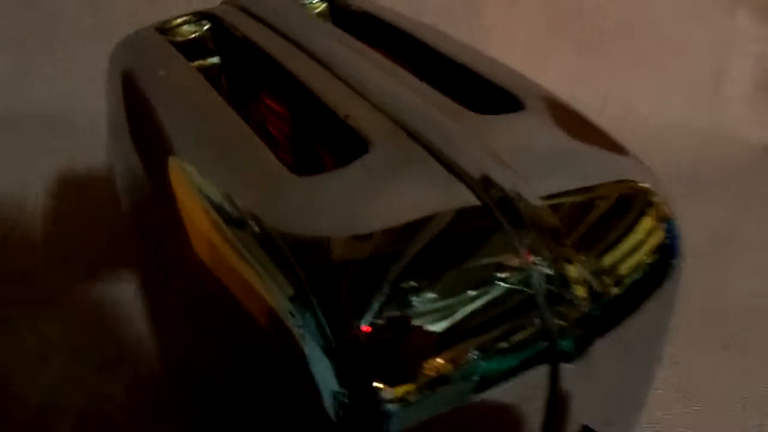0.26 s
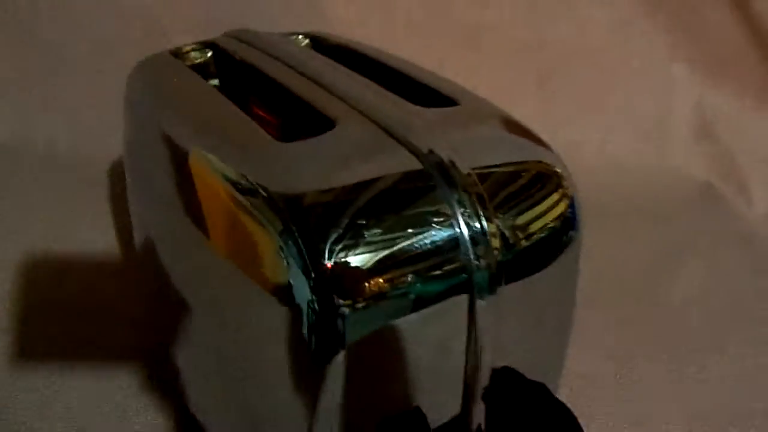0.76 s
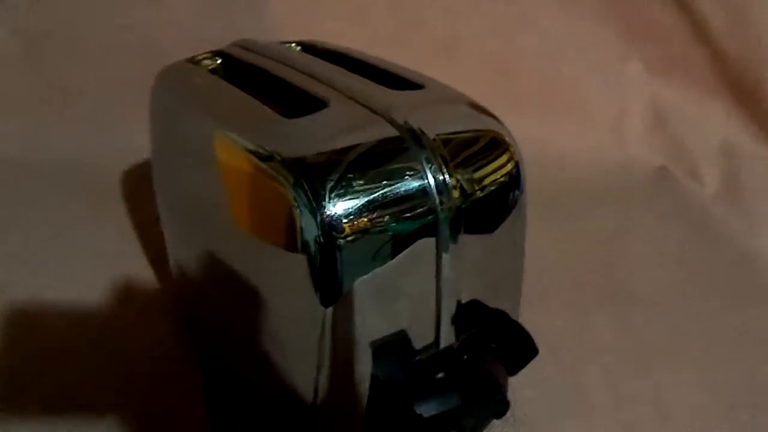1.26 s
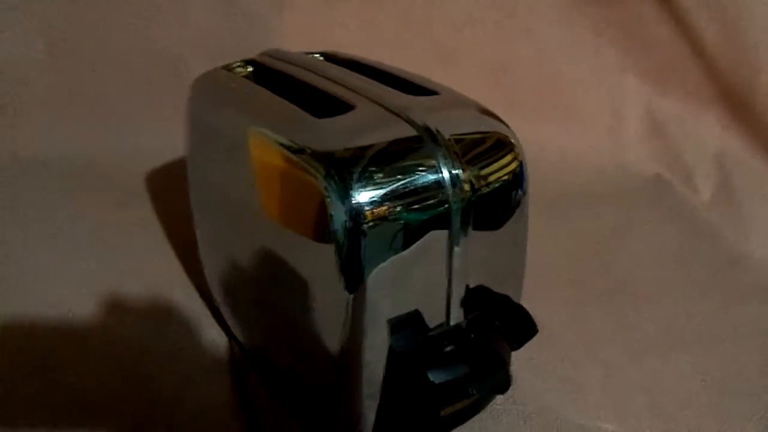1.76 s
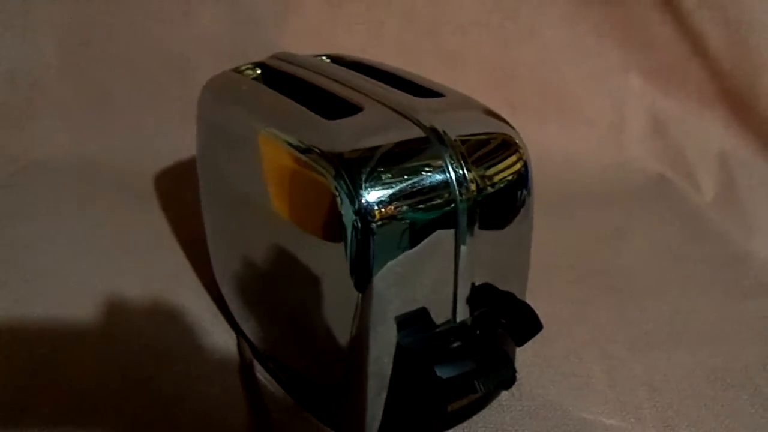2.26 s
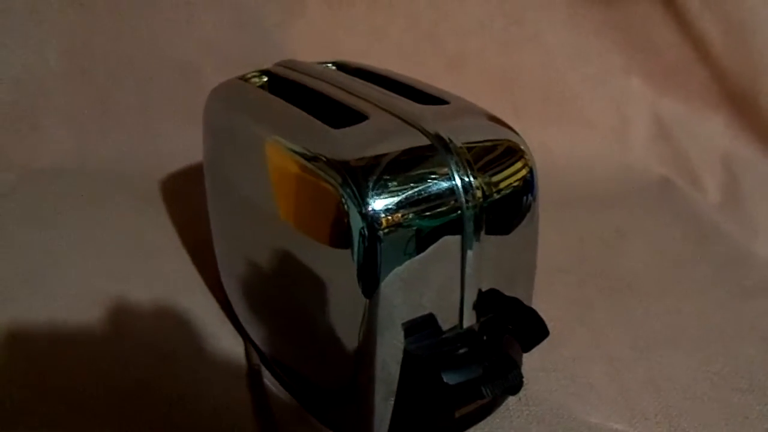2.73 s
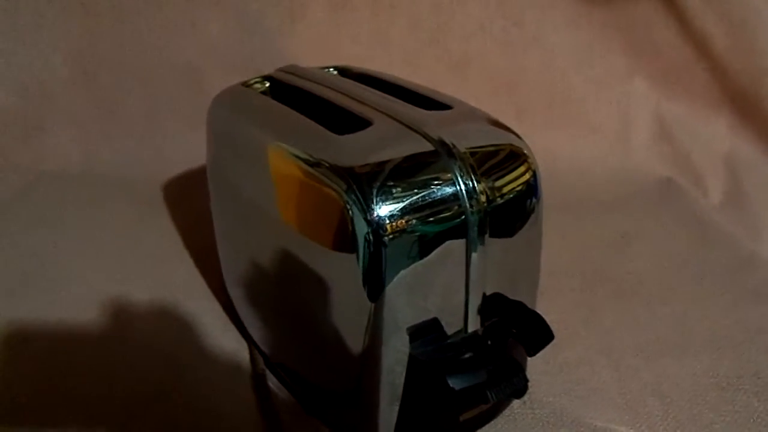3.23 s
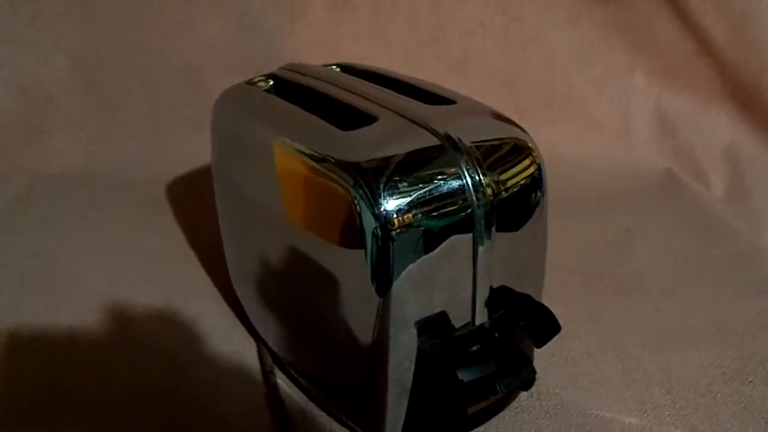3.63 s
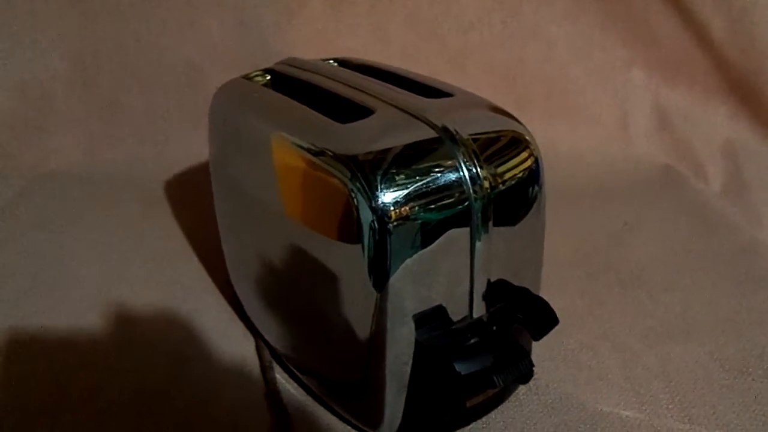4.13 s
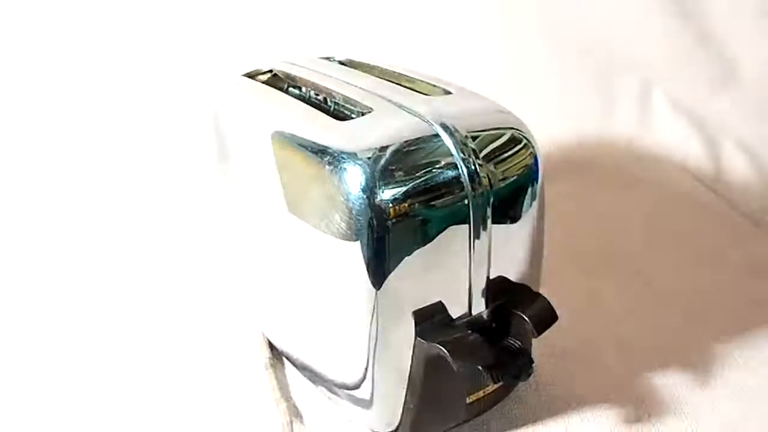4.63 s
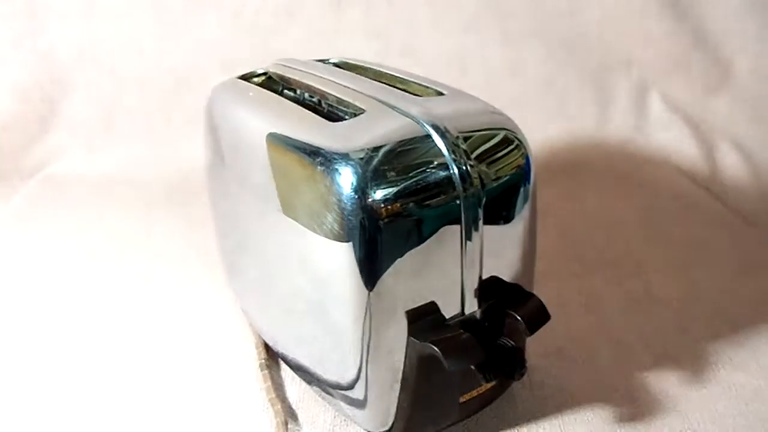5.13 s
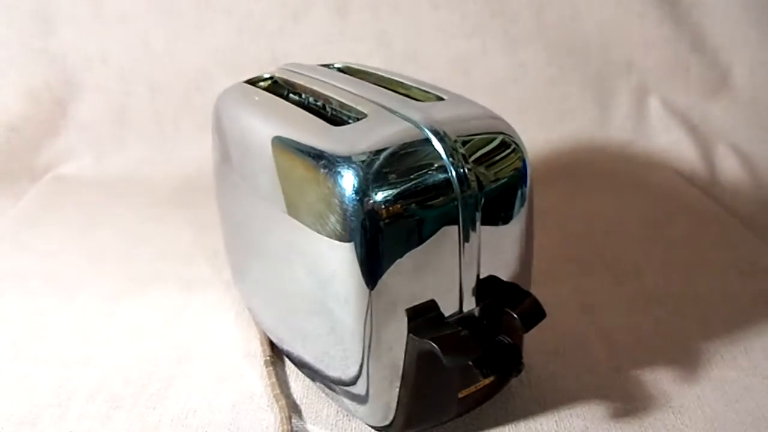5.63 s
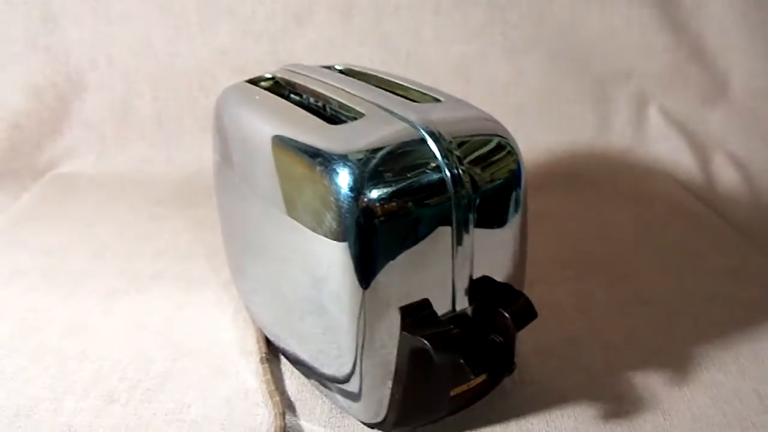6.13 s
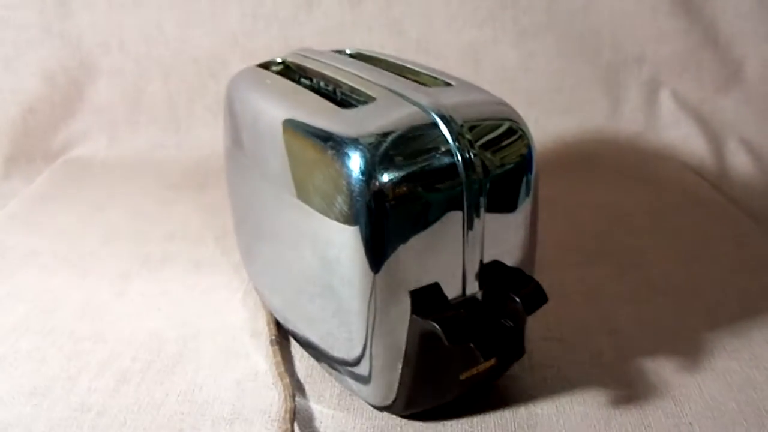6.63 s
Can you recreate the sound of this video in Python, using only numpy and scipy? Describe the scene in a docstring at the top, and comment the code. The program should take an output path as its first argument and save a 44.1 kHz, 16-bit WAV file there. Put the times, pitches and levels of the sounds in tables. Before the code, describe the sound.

A quiet small room heard through a hand-held camera near a chrome toaster: constant soft hiss and low rumble, faint mains hum, a barely audible high whine. From 0 to 1 s, fingers tick and drag faintly on the camera shell, a clearer dry tick at 0.63, among many tiny creaks of warm sheet metal. A small shell tick falls at 1.4. At 2.13 a crisp double metallic tick with a fine rattle stands out, followed by lesser ones at 2.25, 2.52 and 2.62, fading to a faint tick at 2.88. A dry shell tick at 3.35, then calm. At 4.43 the sprung catch releases: a very loud, sharp, scraping clack a few milliseconds long, with bright latch ringing, a low puff and a short room tail. The background immediately drops and stays lower. Faint ticks follow at 5.4, 5.63 and 5.97, then a quick fumble of handling clicks around 6.24 to 6.36, and subdued hiss to nearly 7 s.

```python
"""Throughout, the hiss of a quiet room with faint hum and whine; now and then fingers tick and drag on a camera.
A chrome toaster on a cloth creaks and ticks: short bursts of noise ring its hot sheet metal and leave a rattle.
A sprung catch lets go with a sharp clack: a scrape of noise, a ringing latch and a low push of air.
The small hand-held camera's gain control then turns the whole room down and hardly lets it come back."""
import sys
import numpy as np
from scipy import signal
from scipy.fft import rfft, irfft, next_fast_len
from scipy.io import wavfile
from scipy.ndimage import uniform_filter1d

SR = 44100
rng = np.random.default_rng(int(sys.argv[2]) if len(sys.argv) > 2 else 0)


def pcm_store(signal):
    """Save signal as 16-bit PCM."""
    levels = np.round(np.clip(np.atleast_2d(signal), -1, 1) * 32767)
    wavfile.write(sys.argv[1], SR, levels.astype(np.int16).T)


def level_to_linear(level):
    """Convert decibel levels to linear amplitude factors, elementwise."""
    exponent = np.asarray(level, float) / 20
    return 10 ** exponent


N = 303482   # length in samples


def at_hz(points, hz):
    """Reads a table of (Hz, value) at any frequency, along log frequency."""
    points = np.array(points)
    return np.interp(np.log(hz + 1), np.log(points[:, 0]), points[:, 1])


def colour(x, spectrum):
    """Gives x the spectrum with minimum phase, so nothing sounds early."""
    level_db = at_hz(spectrum, np.fft.rfftfreq(8192, 1 / SR))
    cepstrum = irfft(np.log(level_to_linear(level_db)))
    # folding the cepstrum onto its first half makes the phase minimal
    cepstrum[1:4096] *= 2
    cepstrum[4097:] = 0
    response = irfft(np.exp(rfft(cepstrum)))[:4096]
    size = next_fast_len(len(x) + 4096)
    return irfft(rfft(x, size) * rfft(response, size), size)[:len(x)]


def cut(x, hz, kind):
    """Butterworth filter of design order 2."""
    return signal.sosfilt(signal.butter(2, hz, kind, fs=SR, output="sos"), x)


def band(x, hz, octaves):
    """Band-pass reaching this many octaves to each side of a centre."""
    low = hz * 2 ** -octaves
    high = min(hz * 2 ** octaves, .45 * SR)
    return cut(x, [low, high], "band")


def top_one(x):
    """Scales to a peak of 1."""
    return x / np.max(np.abs(x))


def add(track, s, sound):
    """Mixes a sound in at time s."""
    i = round(s * SR)
    track[i:i + len(sound)] += sound[:N - i]


def grains(size, per_s):
    """Random clicks of uneven strength at random moments."""
    noise = rng.standard_normal(size)
    boost_db = 3.0 * np.minimum(rng.exponential(1, size), 2)
    sounding = rng.random(size) < per_s / SR
    return noise * level_to_linear(boost_db) * sounding


def contact(decay_ms, noise):
    """Rough contact: noise that rises almost at once, then dies to 1/e in every decay_ms."""
    t = np.arange(len(noise)) / SR * 1000 / max(decay_ms, .2)
    return noise * np.exp(-t) * (1 - np.exp(-12 * t))


def struck(force, modes, strengths, damping, swell_cycles):
    """The force rings every mode with a strength of its own; each mode swells over some cycles, then dies."""
    t = np.arange(len(force)) / SR
    rings = np.zeros(len(force))
    for (hz, db, t60), strength in zip(modes, strengths):
        fade = level_to_linear(db - 60 * t / (min(t60, .3) * damping))
        swell = 1 - np.exp(-t * hz / swell_cycles)
        rings += strength * fade * swell * np.sin(2 * np.pi * hz * t)
    return signal.fftconvolve(force, rings)[:len(force)]


# Colour of the hiss and rumble. Each row: frequency in Hz, relative level in dB per Hz.
HISS_COLOUR = [(8.8, -50.5), (15, 5.5), (38, -1.5), (131, -2.5), (301, -8), (462, -11.5), (1370, -22),
               (6950, -31), (7800, -29), (8490, -30.5), (12700, -31.5), (13800, -31.5)]
# Mains hum. Each row: frequency in Hz, rms level in dB.
MAINS_HUM = [(30, -58.5), (60, -61.5), (120, -59.5)]
HISS_DB = -43.5   # rms
WHINE_HZ, WHINE_DB, WHINE_FLIPS_PER_S = 7880, -68, 30   # rms level before its narrow filter


def floor():
    """Microphone hiss and room rumble, mains hum and a thin whine whose sign flips with every picture frame."""
    t = np.arange(N) / SR
    hiss = colour(rng.standard_normal(N + 4096), HISS_COLOUR)[4096:]   # drops the filter's start
    hum = sum(level_to_linear(db) * np.sqrt(2) * np.sin(2 * np.pi * (hz * t + rng.random())) for hz, db in MAINS_HUM)
    flips = signal.square(np.pi * WHINE_FLIPS_PER_S * t)
    whine = band(np.sqrt(2) * np.sin(2 * np.pi * WHINE_HZ * t) * flips, WHINE_HZ, octaves=0.0291)
    return level_to_linear(HISS_DB) * hiss / np.std(hiss) + hum + level_to_linear(WHINE_DB) * whine


# Dry ticks on the camera shell. Each row: start in seconds, peak of the upper part in dB, its centre in Hz,
# peak of the lower part in dB, its centre in Hz.
SHELL_TICKS = [(0.079, -42, 12000, -54, 1100), (.6347, -35, 12900, -35, 3850),
               (1.3995, -36.5, 11000, -50, 1590), (3.3466, -31.5, 13000, -56, 1430),
               (5.4016, -40, 8990, -52, 1120), (5.9743, -36, 9650, -55, 1270),
               (6.239, -30, 8300, -35.5, 1240), (6.3165, -31, 12000, -39, 1900),
               (6.331, -38, 7000, -43, 3000), (6.349, -38, 7000, -28, 1140), (6.350, -24, 12000, -25, 3500),
               (6.357, -27.5, 8400, -27.5, 3200)]
# Fingers drag on the shell. Each row: moment of firmest grip in seconds, rms level then in dB,
# swell before it in dB per second, fade after it in dB per second.
FINGER_DRAGS = [(.3, -54, 50, 70), (.65, -50.5, 70, 45), (6.34, -44, 350, 900)]
SHELL_DECAY_MS = 1.2   # time to die to 1/e


def shell():
    """Ticks and a grainy drag right at the microphone: bright and without room."""
    t = np.arange(N) / SR
    rub = cut(grains(size=N, per_s=4000), 1100, "high")
    grip = np.zeros(N)
    for s, db, swell, fade in FINGER_DRAGS:
        grip += level_to_linear(db - np.maximum(swell * (s - t), fade * (t - s)))
    out = grip * rub / np.std(rub)
    for s, high_db, high_hz, low_db, low_hz in SHELL_TICKS:
        noise = rng.standard_normal((2, 2000))
        upper = band(contact(SHELL_DECAY_MS, noise[0]), high_hz, octaves=0.45)
        lower = band(contact(SHELL_DECAY_MS, noise[1]), low_hz, octaves=0.7)
        add(out, s, level_to_linear(high_db) * top_one(upper))
        add(out, s, level_to_linear(low_db) * top_one(lower))
    return out


# Low end of the crackle, under the casing ring. Each row: frequency in Hz, relative level in dB per Hz.
CRACKLE_LOW = [(300, -25), (500, 0), (1000, -6.5)]
# The bright rest, before tilting; its first row is skipped.
# Each row: frequency in Hz, relative level in dB per Hz.
CRACKLE_BRIGHT = [(1410, -40), (2400, -11), (3800, 2.5), (4140, -2), (5930, 0), (6310, 1), (7940, -2),
                  (13400, -9), (14200, -33), (15000, -50)]


def crackle(force, tilt_db):
    """Colours a force as the bright part of a tick, tilted about 4 kHz by tilt_db per octave; peak 1."""
    tilted = [(hz, db + tilt_db * np.log2(hz / 4000)) for hz, db in CRACKLE_BRIGHT[1:]]
    return top_one(colour(force, CRACKLE_LOW + tilted))


# Sheet metal ticking as it heats and cools. Each row: start in seconds, peak of the casing ring in dB,
# peak of the crackle in dB, centre of the ring in Hz, tilt of the crackle in dB per octave.
METAL_TICKS = [(0.246, -34.5, -42.5, 1560, -1), (0.2834, -41, -32.5, 1320, -10),
               (0.366, -41, -48.5, 1560, -3), (0.488, -41, -47, 1250, -1), (0.5408, -36.5, -44, 1600, -7),
               (0.561, -36, -49, 1330, -1), (0.581, -40, -52, 1470, -1), (0.765, -37, -47, 1410, -5),
               (0.834, -38, -45, 1630, -5), (0.864, -39.5, -45, 1590, -3), (0.8966, -41, -50.5, 1630, -3),
               (0.9682, -44, -47.5, 1630, 3), (2.1276, -19, -22, 1520, -0.5),
               (2.1382, -20.5, -22.5, 1770, -2.5), (2.255, -25, -33.5, 1560, -6),
               (2.5208, -26.5, -23, 1550, -3.5), (2.6231, -30.5, -28, 1180, -4),
               (2.6597, -40, -41, 1410, -5), (2.6872, -40, -43.5, 1610, -1), (2.8784, -33.5, -38, 1600, -8),
               (5.633, -32, -34.5, 1460, 5)]
# Ways the casing rings. Each row: frequency in Hz, relative level in dB,
# seconds to fall 60 dB before the cap and damping in struck().
CASING_MODES = [(1005, -11, 0.42), (1180, -5.5, 0.2), (1350, 0, 0.12), (1665, 8, 0.1), (1830, -1, 0.31),
                (1770, 10, 0.03), (1850, -11, 0.062), (2400, -23, 0.69), (2800, -6.5, 0.5),
                (3000, -10, 0.082), (3650, 1.5, 0.12), (4010, -21, 0.25), (4160, -16, 0.28),
                (4480, -12, 0.1), (5400, -32, 0.33), (5620, -10, 0.1)]
CONTACT_DECAY_MS, RATTLE_DECAY_MS = 4.07, 30   # times to die to 1/e
UPPER_RING_DB, RATTLE_DB = -17, -12   # peaks against the crackle
RATTLES_PER_S, RATTLE_TILT_DB = 1500, 6   # tilt per octave on top of the tick's own


def ticks():
    """Each tick rings the casing around its own spot, crackles and rattles loose parts; (low, bright)."""
    low, bright = np.zeros((2, N))
    for s, ring_db, crackle_db, hz, tilt_db in METAL_TICKS:
        noise = rng.standard_normal((2, 6000))
        strengths = level_to_linear(rng.normal(0, 3, len(CASING_MODES)))
        low_force = contact(CONTACT_DECAY_MS, noise[0])
        bright_force = contact(CONTACT_DECAY_MS, noise[1])
        ring = struck(low_force, CASING_MODES, strengths, damping=0.091, swell_cycles=0.16)
        add(low, s, level_to_linear(ring_db) * top_one(band(ring, hz, octaves=0.49)))
        upper = struck(bright_force, CASING_MODES, strengths, damping=0.32, swell_cycles=1.7)
        upper = cut(cut(upper, 2700, "high"), 2700, "high")
        rattle = contact(RATTLE_DECAY_MS, grains(size=6000, per_s=RATTLES_PER_S))
        sound = crackle(bright_force, tilt_db)
        sound = sound + level_to_linear(UPPER_RING_DB) * top_one(upper)
        sound = sound + level_to_linear(RATTLE_DB) * crackle(rattle, tilt_db + RATTLE_TILT_DB)
        add(bright, s, level_to_linear(crackle_db) * sound)
    return low, bright


# How fast the room dies away. Each row: frequency in Hz, seconds to fall 60 dB.
ROOM_DECAY = [(300, 0.4), (1500, 0.25), (5000, 0.21), (12000, 0.16)]


def room(x):
    """Dense reflections: noise that builds over a few ms and dies band by band."""
    t = np.arange(SR // 2) / SR
    edges = 200 * 2 ** np.arange(0, 6.4, .5)   # half-octave bands, in Hz
    noise = rng.standard_normal((2, len(t)))
    tail = np.zeros(len(t))
    for k, (low, high) in enumerate(zip(edges, edges[1:])):
        t60 = at_hz(ROOM_DECAY, np.sqrt(low * high))
        tail += cut(noise[k % 2], [low, high], "band") * level_to_linear(-60 * t / t60)   # neighbours use different noise
    tail = tail * (1 - np.exp(-t / .004))
    return signal.fftconvolve(x, tail / np.sqrt(np.sum(tail ** 2)))[:N]


CATCH_S, BITE_DB, CATCH_DB = 4.4293, -12, -5   # start; rms force at first bite and at full scrape
BITE_MS, SWELL_MS, HOLD_MS, LET_GO_MS = .7, 2.5, 4.7, 1.5   # stages of the scrape
CHATTER_DB, CHATTER_DB_PER_MS = -15, 1.5   # rms force once it has let go, and its fall


def catch_force():
    """The catch bites, swells to a held scrape, lets go and chatters out."""
    stages_ms = [0, BITE_MS, SWELL_MS, HOLD_MS, LET_GO_MS, 40 / CHATTER_DB_PER_MS]
    s = CATCH_S + np.cumsum(stages_ms) / 1000
    db = [BITE_DB - 30, BITE_DB, CATCH_DB, CATCH_DB, CHATTER_DB, CHATTER_DB - 40]
    return level_to_linear(np.interp(np.arange(N) / SR, s, db, left=-200, right=-200))   # silent outside


# Ring of the latch. Each row: frequency in Hz, level in dB before its swell and fade,
# seconds to fall 60 dB before the damping in struck().
LATCH_MODES = [(955, -28.5, .2), (1053, -27.5, .16), (1513, -22, .13), (2870, -29, 0.13), (3036, -36, .14),
               (3720, -29.5, 0.15), (4180, -32.5, .12), (4574, -28.5, 0.079), (5500, -28.5, .1),
               (5955, -14.5, .13), (6070, -12, 0.12), (6320, -27.5, .1), (7400, -33.5, 0.068),
               (7586, -16.5, .11), (7970, -26, .16), (8210, -16, 0.13), (8430, -22, .09),
               (8900, -19.5, 0.11), (8880, -22, 0.1095), (10630, -19.5, 0.0895), (10770, -17.5, .08),
               (11305, -20.5, .07), (11400, -17, .11), (12250, -18.5, .1), (12700, -23, .085)]
# Colour of the crack. Each row: frequency in Hz, relative level in dB per Hz.
CRACK_COLOUR = [(180, -50.5), (300, -19), (700, -24), (1510, -20.5), (2170, -25), (2980, -14.5),
                (4140, -23.5), (4570, -8), (5570, -16), (6150, -4), (9930, -12.5), (12500, -3.5),
                (14000, -16.5), (15500, -50)]
STOP_S = 4.4315   # the latch hits its stop
THUMP_S, THUMP_DB, THUMP_MS = 4.4335, -23, 1.1   # push of air: start, peak, time scale


def clack():
    """A broad crack under the force curve; the latch rings from the blow on its stop, with a low push of air."""
    force = catch_force()
    crack = force * colour(rng.standard_normal(N), CRACK_COLOUR)
    crack = crack * np.sqrt(np.sum(force ** 2) / np.sum(crack ** 2))   # as strong as the force curve
    ring = np.zeros(N)
    signs = rng.choice([-1, 1], len(LATCH_MODES))
    blow = np.arange(9000) == 0   # a single click
    add(ring, STOP_S, struck(blow, LATCH_MODES, signs, damping=0.87, swell_cycles=9.7))
    t = np.arange(2000) / SR * 1000 / THUMP_MS
    add(ring, THUMP_S, level_to_linear(THUMP_DB) * top_one(t * np.exp(-t) * (t - 4.5)))
    return crack, ring


def scene():
    """The toaster in its room, the camera shell and the floor."""
    low, bright = ticks()
    crack, ring = clack()
    wet = room(level_to_linear(-7.5) * low + level_to_linear(-1.5) * bright + level_to_linear(-10.5) * crack)
    return (low + bright + crack + ring + wet + shell() + floor())[None]


def low_pass(x):
    """Removes everything above the highest recorded frequency."""
    return signal.sosfilt(signal.butter(12, 15990, fs=SR, output="sos"), x)


def record(dry):
    """Levels over the knee pull the gain down within ms; it creeps back slowly. Treble is cut, tops are rounded."""
    knee_db, slope = -15.5, 0.74   # slope: dB turned down per dB over the knee
    attack_ms, release_db_s = 9.0, 0.03   # release: fall of the held level, dB per second
    cutoff_hz, cutoff_db = 13950, 58   # treble edge, and how far down the treble beyond it is held
    top = .8   # height at which the peaks flatten
    t = np.arange(N) / SR
    power = np.abs(uniform_filter1d(dry ** 2, size=220))   # over 5 ms
    level_db = 10 * np.log10(power + 1e-18)
    held_db = np.maximum.accumulate(level_db + release_db_s * t, axis=1) - release_db_s * t
    r = np.exp(-1000 / (attack_ms * SR))
    duck_db = signal.lfilter([1 - r], [1, -r], slope * np.maximum(held_db - knee_db, 0))
    steep = signal.ellip(10, .5, cutoff_db, cutoff_hz, fs=SR, output="sos")
    dull = signal.sosfilt(steep, dry * level_to_linear(-duck_db))
    mix = top * np.tanh(dull / top)
    return low_pass(mix)


dry = scene()
out = record(dry)
pcm_store(out)
```